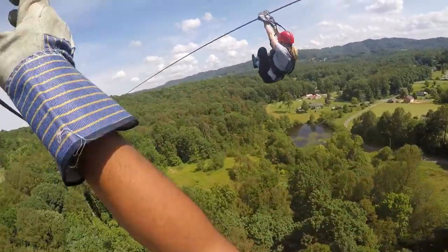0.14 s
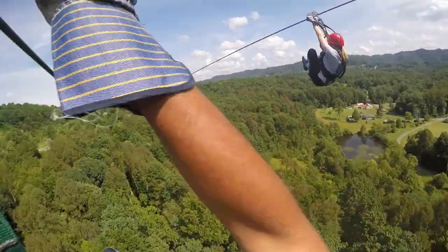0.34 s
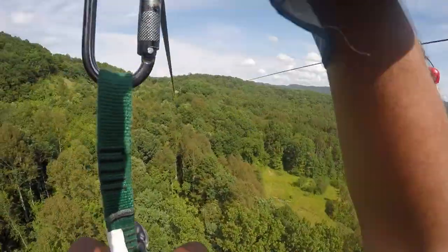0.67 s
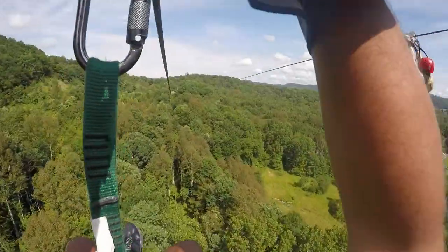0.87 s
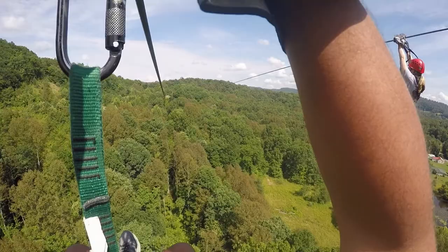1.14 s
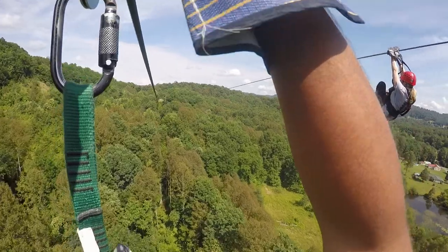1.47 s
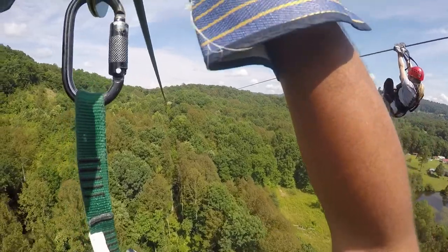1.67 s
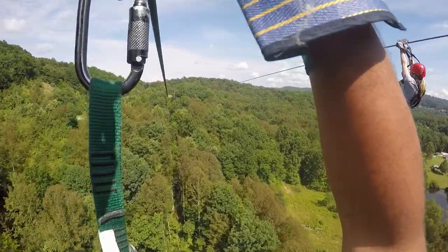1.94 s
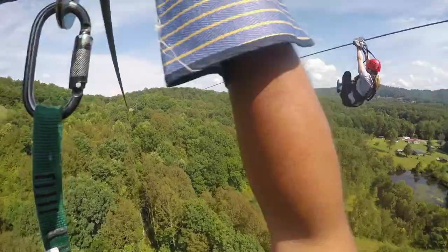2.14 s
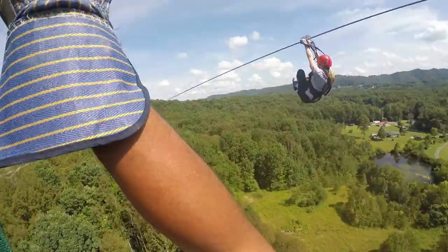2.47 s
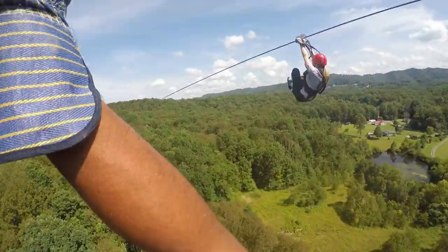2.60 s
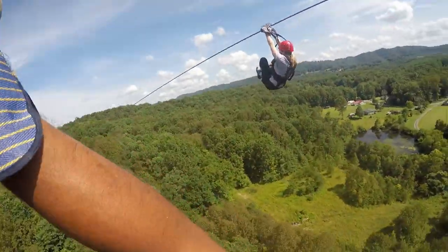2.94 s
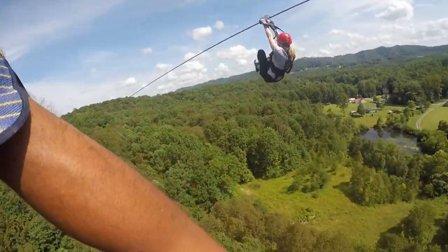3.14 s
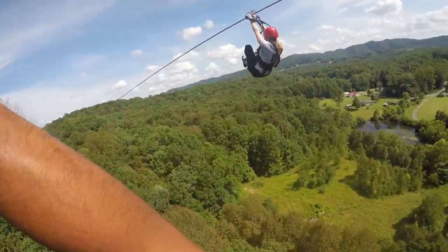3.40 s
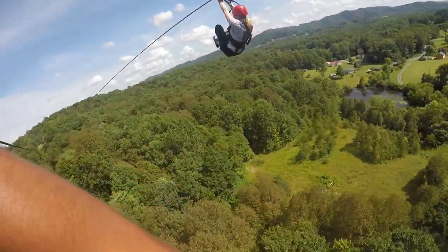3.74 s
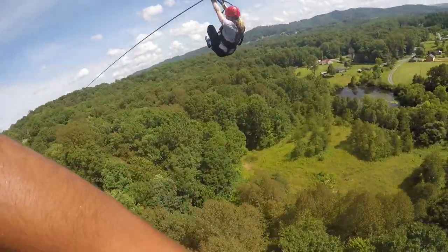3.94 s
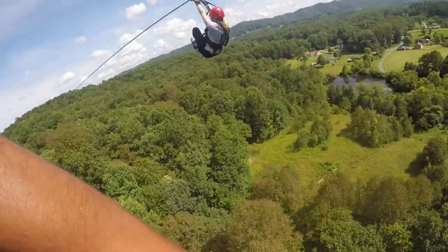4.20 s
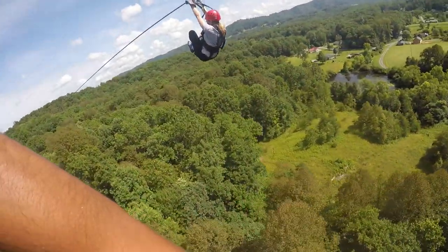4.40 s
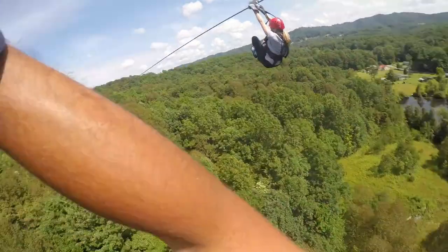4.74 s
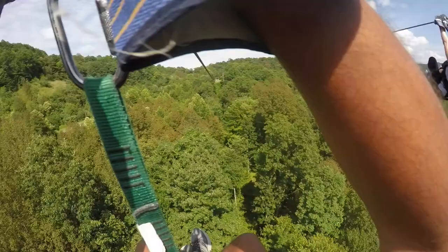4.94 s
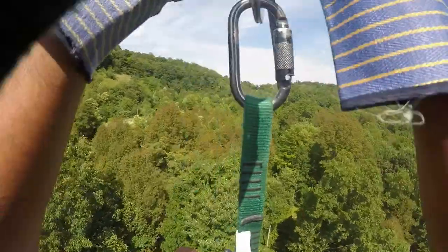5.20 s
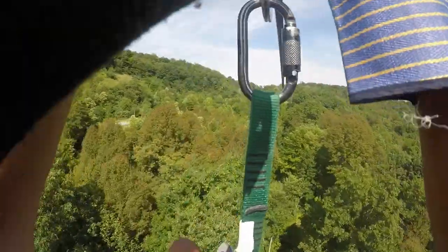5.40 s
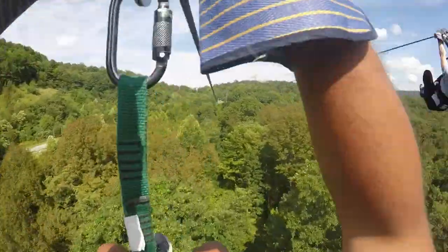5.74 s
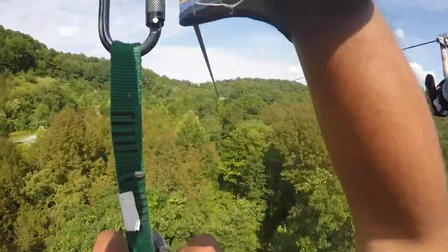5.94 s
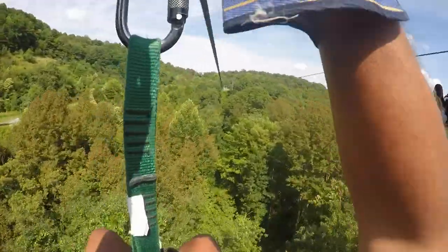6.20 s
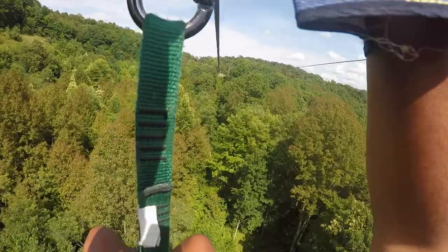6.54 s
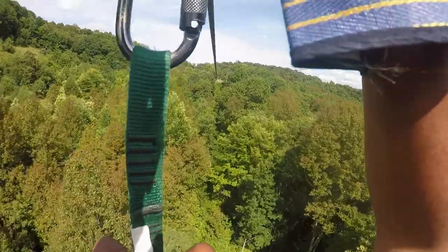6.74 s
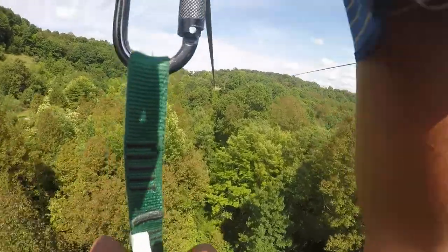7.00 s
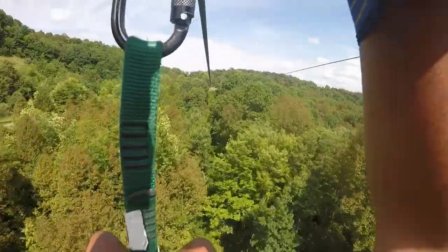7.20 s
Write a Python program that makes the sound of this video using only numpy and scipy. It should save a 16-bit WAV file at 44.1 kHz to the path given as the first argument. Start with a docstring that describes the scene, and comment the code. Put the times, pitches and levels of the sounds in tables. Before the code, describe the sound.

Outdoors on a zip line, a helmet-mounted microphone is buffeted by deep, irregular wind thumps and fluttering rushes. Just overhead, a two-wheeled trolley rolls along a twisted steel cable with a continuous rough metallic whirr, bearings hissing and rattling. Short high whistles come and go, and the tone brightens or dulls as the head turns, while the rolling very gradually slows.

```python
"""Under a six-strand steel cable: a two-wheel trolley rolls down it and slows, just above a helmet camera.
The twisted wires shake both wheels in a pattern that partly returns with every twist, so the trolley rings
in its modes, louder or duller as the head turns; its bearings rattle and some rings sharpen into whistles.
Close on the microphone port, wind thumps, flutters and rushes, and air streams past helmet and straps."""
import sys
import numpy as np
from scipy import signal
from scipy.fft import rfft, irfft, next_fast_len
from scipy.io import wavfile
from scipy.ndimage import uniform_filter1d, map_coordinates

SR = 44100
rng = np.random.default_rng(int(sys.argv[2]) if len(sys.argv) > 2 else 0)


def transcribe(u):
    """Save the signal u as a 16-bit wav file named by the first command-line argument.

    u: samples, shape (n,) or (channels, n), limited to [-1, 1]; the rate is SR.
    q: integer samples, one column per channel.
    """
    v = np.clip(np.atleast_2d(u).T, -1, 1)
    q = np.round(v * 32767).astype(np.int16)
    wavfile.write(sys.argv[1], SR, q)


N = 324555

# cable twists passing under a wheel at the start, and their steady slowing
TWISTS_HZ, SLOWING_HZ_PER_S = 164.7, 3.8
# Modes of each trolley part, low to high:
# f/Hz, width/Hz, relative level/dB in posture 0, 1, 2, 3
PLATES = [(1784, 264, -11.5, -7.5, -9.5, -15.5), (1995, 180, -9.5, -6, -1, -3),
          (2220, 220, 0.5, -1, 0, 2.5), (2348, 270, -5.5, 1.5, -4, -0.5)]
WHEELS = [(2941, 360, -3, 0, -6.5, -1), (3300, 160, -7, -15, -8.5, -16), (3520, 260, -12, 1, -4, -33),
          (3685, 200, 1, -1, -2.5, 5), (3972, 195, -3.5, -5.5, -5.5, -3)]
FRAME = [(4353, 340, 1.5, -32, -4.5, 6.5), (4650, 240, 1.5, 6.5, 0, 8.5), (4890, 136, -14, 6.5, 4, -10),
         (4974, 95, 0.5, -15, -9, 10)]
AXLE = [(5330, 250, 0.5, 3, 0, 10), (5695, 180, -1, 1, 2, 5), (5870, 220, -3.5, -8, 2, -3),
        (6325, 320, -19, -8, 3.5, -0.5)]
LINKS = [(6790, 360, 6.5, 2.5, -7, 3), (7210, 330, 3, 2, -4, -10), (7620, 230, 2, -12, 1, 0.5),
         (8120, 290, 1, -6, 2, 1.5)]
BEARING_RACES = [(8880, 135, 1, -3, 0.5, 1.5), (9550, 230, -1, 1, -7, 2), (10270, 380, -8, -1, -2, -8),
                 (11180, 360, -6.5, -6, 0.5, -5), (11700, 190, 1, -3, -5, 1), (12500, 540, -8, -3, -12, -8)]
BEARING_CAGE = [(13000, 700, -9, -5, -2, -9), (13590, 440, 0, 0, 0, 0), (14400, 700, -15, -9, -6, -14)]
# Each part before the swings, in the order above: level/dB in posture 0, 1, 2, 3,
# then its shares [no unit] of the treble, wheel and axle swings
PART_LEVELS = [(-26, -28, -30.5, -23.5, 0, 0.11, 0.012), (-22.5, -20.5, -22.5, -22, 0.056, 0.75, 0),
               (-24.5, -24, -31.5, -24.5, 0.022, -0.77, 0), (-29.5, -32, -32.5, -37, 0.19, 0.006, 0.96),
               (-33.5, -35, -48, -35, 0.29, -0.64, 0.02), (-40.5, -43, -44.5, -43, .3, .1, 0.18),
               (-39.5, -43.5, -48, -42.5, 0.59, 0.24, 0)]
# Level of all parts, which dips after the first thump of wind and recovers,
# and swings before each part takes its share:
# t/s, level/dB, treble/dB, wheels against frame/dB, axle/dB
TROLLEY_LEVELS = [(0, -3, 3, 1, 1), (.24, -5.5, 7, -2, 3), (.6, 0, 2, 1.5, 1), (1, -1, 1, 2.5, 2),
                  (1.3, 0.5, 2, 0.2, 0), (2.03, 0, 2, -2, 2.5), (2.15, -2.5, 0, -1, 4), (2.4, -2, 6, 1, 0),
                  (2.55, 0.5, -6, -1, -2), (2.66, 0.5, -4, 0, -1), (3, 0, -7, 0.6, 0),
                  (3.4, 1.5, -2, 1, 0.5), (3.83, -1, 0, 0.2, 0), (4.6, 0, -1, 0, 1), (4.96, 0, 6, 0, 4),
                  (5.45, 1, 3, -3, 2), (5.6, 0.5, 4, 0, -4), (5.75, -0.5, 4, 2, 4), (6.05, 0, 5, 0.5, 1),
                  (6.19, 1, -4, -0.5, 0), (6.39, 1.5, 2, 2, -2), (6.72, 0.5, -10, -0.5, -8),
                  (6.87, 1, 5, -0.5, 1), (7.13, 1.5, -12, -1, -7), (7.36, 0.5, -2, 0.5, 1)]
# Strands bumping the groove, before they waver: t/s, level/dB of about six per twist, level/dB of its octave
STRANDS = [(0, -60, -50), (.45, -58, -50), (.7, -40.5, -53), (1.901, -42.5, -52), (2.6, -45, -45),
           (4.6, -50.5, -44), (5.5, -54, -57), (7.36, -74, -58)]


def trolley():
    """Just overhead: the cable drives the low parts, the ball bearings the high ones; each flickers a little."""
    twists_per_s = TWISTS_HZ - SLOWING_HZ_PER_S * np.arange(N) / SR
    travel = np.cumsum(twists_per_s) / SR  # in twists
    cable = unit(wires(travel))
    balls = unit(rattle(spread_db=0.2, per_s=20000))
    cage = unit(rattle(spread_db=1.5, per_s=8000))
    driven_parts = [
        (cable, PLATES),
        (cable + 0.75 * balls, WHEELS),
        (cable, FRAME),
        (cable + 0.18 * balls, AXLE),
        (0.25 * cable + 1.4 * balls, LINKS),
        (balls, BEARING_RACES),
        (cage, BEARING_CAGE),
    ]
    posture = head_posture()
    metal = whistles()
    level_db, *swings_db = curves(TROLLEY_LEVELS)
    for (drive, modes), row in zip(driven_parts, PART_LEVELS):
        posture_db, swing_shares = row[:4], row[4:]
        part_db = facing(posture_db, posture) + level_db + np.dot(swing_shares, swings_db)
        part = turning(drive, modes, posture)
        metal = metal + part * undb(part_db + 0.92 * walk(12))
    out = echoes(metal, posture)
    for per_twist, strand_db in zip((5.964, 11.93), curves(STRANDS)):
        waver = undb(3 * walk(20))
        out = out + undb(strand_db) * waver * np.sin(2 * np.pi * per_twist * travel + 2 * walk(25))
    return out


REPEAT = 0.31  # share of the roughness kept per twist
SECOND_WHEEL, WHEELBASE = -0.27, .812  # share of the rear wheel, spacing in twists
PER_TWIST = 512  # points of roughness


def wires(travel):
    """Roughness along the cable resembles that of one twist before; both wheels roll over it in turn."""
    feedback = np.zeros(PER_TWIST + 1)
    feedback[0], feedback[-1] = 1, -np.clip(REPEAT, 0, .9)
    points = int(travel[-1] + 2) * PER_TWIST
    bumps = signal.lfilter([1.], feedback, rng.standard_normal(points))
    front = map_coordinates(bumps, [(travel + 1) * PER_TWIST], order=1)
    rear = map_coordinates(bumps, [(travel + 1 - WHEELBASE) * PER_TWIST], order=1)
    return front + SECOND_WHEEL * rear


def rattle(spread_db, per_s):
    """Bearings: dense metal ticks of uneven size, coming in flurries."""
    ticks = rng.random(N) < per_s / SR
    uneven_db = spread_db * np.minimum(rng.exponential(size=N), 4.)
    flurry_db = 1.03 * walk(14)
    return ticks * undb(uneven_db + flurry_db) * rng.standard_normal(N)


# A ring briefly sharpens into a whistle:
# start t/s, length/s, start f/Hz, end f/Hz, level/dB before wavering
WHISTLES = [(.28, .14, 5100, 4550, -29), (.52, .35, 5870, 5800, -29), (.58, .52, 5665, 5610, -26.5),
            (1.62, .55, 2220, 2185, -28), (1.0, .55, 2225, 2200, -30), (2.3, .3, 4560, 4520, -29),
            (2.35, .9, 4830, 4730, -30), (2.7, .9, 2335, 2270, -29), (4.7, .3, 4585, 4555, -24.5),
            (4.8, .3, 5020, 4990, -31), (5.4, .18, 5295, 5285, -28), (5.64, .2, 5030, 4960, -30),
            (5.78, .16, 4540, 4520, -28), (6.8, .35, 4775, 4740, -27)]


def whistles():
    """Gliding tones, wavering in pitch and level, that swell and fade."""
    out, t = 0, np.arange(N) / SR
    for start, length, start_hz, end_hz, db in WHISTLES:
        part = np.clip((t - start) / length, 0, 1)
        hz = start_hz + (end_hz - start_hz) * part + 12.0 * walk(40)
        phase = 2 * np.pi * np.cumsum(hz) / SR
        swell = np.sin(np.pi * part) ** .5
        out = out + undb(db + 2.5 * walk(30)) * swell * np.sin(phase)
    return out


# How the head turns under the cable:
# t/s, posture [0 ahead, 1 aside, 2 further round, 3 ahead and nearer the strap]
POSTURE = [(0, 1.4), (.3, 1.07), (.5, 0.0094), (2.08, 0.0097), (2.2, 0.56), (2.8, 1), (2.9, 1.23),
           (3.4, 1.6), (3.55, 2.01), (4.67, 2.07), (4.73, 2.4), (4.95, 2.86), (7.36, 2.9)]


def head_posture():
    """Posture of the head, and the microphone with it, gliding between the listed ones."""
    return curves(POSTURE)[0]


def facing(levels, posture):
    """A value given for each posture, followed as the head turns."""
    return np.interp(posture, np.arange(len(levels)), levels)


def nearness(posture, k):
    """Crossfade share of posture k."""
    return np.clip(1 - abs(posture - k), 0, 1)


def turning(x, table, posture):
    """The same modes, each louder or fainter with the posture of the head."""
    hz, width, *levels = np.transpose(table)
    return unit(sum(nearness(posture, k) * ring(x, list(zip(hz, width, db)), steep=1.55)
                    for k, db in enumerate(levels)))


# Echoes off arm and helmet cancel narrow bands at the microphone:
# f/Hz, width/Hz, share cancelled [0 to 1] in posture 0, 1, 2, 3
DIPS = [(2630, 200, .1, .65, .5, .1), (3390, 200, .1, .1, .1, .4), (5330, 170, .3, .1, .5, .1),
        (6050, 170, .3, .6, .1, .3)]


def echoes(x, posture):
    """Close echoes notch the spectrum, each posture with its own depths."""
    def gain(f, k):
        return np.prod([1 - row[2 + k] / (1 + (2 * (f - row[0]) / row[1]) ** 2) for row in DIPS], axis=0)
    dipped = sum(nearness(posture, k) * shape(x, lambda f: gain(f, k)) for k in range(4))
    return dipped * np.sqrt(np.mean(x ** 2))


# Wind on the port, before gusts and offsets:
# t/s, large eddies level/dB, middle eddies level/dB, small eddies level/dB
WIND = [(0.0, -20, -21, -19.5), (0.04, -11, -19, -23), (0.16, -31, -27, -29), (0.26, -20.5, -22, -23.5),
        (0.78, -21.5, -18, -21), (1.07, -23, -20.5, -25.5), (1.29, -17, -16.5, -20.5),
        (1.7, -20, -19.5, -24), (1.97, -23, -12.5, -21.5), (2.01, -13.5, -21, -24), (2.15, -16, -32, -21.5),
        (2.44, -28, -18.5, -18.5), (2.58, -19.5, -16.5, -22), (3.5, -18.5, -18.5, -26),
        (3.65, -21, -13.5, -24.5), (3.77, -12.5, -22.5, -28.5), (4.82, -18.5, -21.5, -30),
        (5.47, -23, -17, -22), (6.03, -19, -22, -28.5), (6.23, -17.5, -20, -22), (6.66, -24, -15.5, -24),
        (6.86, -16.5, -22.5, -29.5), (6.95, -29, -14.5, -23.5), (7.09, -19, -18, -21.5),
        (7.22, -28, -23, -27), (7.36, -25, -17, -22.5)]
# Eddy sizes, deepest first: f/Hz, width/Hz, relative level/dB
# (sizes in the first two tables are played one by one at levels of their own, so this level cancels)
BUFFET = [(35, 26, 0), (53.2, 23, 0)]
FLUTTER = [(85, 32, -0.29), (121.8, 44, -0.71)]
FLAP = [(165.8, 53, -1.5), (240.5, 68, -5)]
# Lean of the flutter to its higher eddy size: t/s, level/dB (added to the higher, taken from the lower)
FLUTTER_LEAN = [(0, -0.5), (1.2, -0.5), (1.6, 0), (2.6, -2.5), (3.4, 0.5), (4.2, -1), (4.95, 1.5), (5.2, 5),
                (5.8, 2), (6.2, 0), (6.7, -3.5), (7.36, -2.5)]
# Deepest eddies against the large ones: level/dB in posture 0, 1, 2, 3
DEEP_LEVELS = [-4.5, -6, -11, -5]
# Rush against the small eddies: level/dB in posture 0, 1, 2, 3
RUSH_LEVELS = [-14.5, -12.5, -4, -16]
# Spectrum of the rush: f/Hz, relative level/dB (per Hz)
RUSH = [(150, -5.5), (300, -1), (400, -3.5), (550, -10), (850, -15.5), (1400, -19), (3000, -42)]


def wind():
    """At the port: large eddies thump, smaller ones flutter and flap; their bursts carry a rush upward."""
    large_db, middle_db, small_db = curves(WIND)
    thump_db, swell_db = gusts()
    posture = head_posture()
    rush_db = small_db + facing(RUSH_LEVELS, posture) + swell_db
    lean_db = curves(FLUTTER_LEAN)[0]
    burst = walk(25)  # shared by the rush and every eddy size
    rush_hz, spectrum_db = np.transpose(RUSH)
    rush = shape(rng.standard_normal(N), lambda f: undb(np.interp(np.log(f), np.log(rush_hz), spectrum_db)))
    out = rush * undb(rush_db + 1.4 * burst)
    out = out + stream()
    # modes, level in dB, depth of the bursts in dB
    sizes = [
        (BUFFET[:1], large_db + thump_db + facing(DEEP_LEVELS, posture), 1.2),
        (BUFFET[1:], large_db - 1.56 + thump_db, .4),
        (FLUTTER[:1], middle_db - 3.5 - lean_db, 0.35),
        (FLUTTER[1:], middle_db - 3.0 + lean_db, 0.27),
        (FLAP, small_db + 0.14 * swell_db, 1.1),
    ]
    for modes, db, burst_db in sizes:
        eddies = ring(rng.standard_normal(N), modes, steep=1.42)
        # a soft limiter holds each eddy size near one strength
        limited = np.tanh(0.64 * eddies)
        out = out + unit(ring(limited, modes, steep=0.48)) * undb(db + burst_db * burst)
    return out


# Gusts slap the port: centre t/s, length/s, thump level/dB, rush level/dB
# (the small eddies take only a share of the rush)
GUSTS = [(0.03, .1, 3.5, 9), (0.83, 0.23, 6.5, 6.5), (1.197, 0.081, 4, 4), (1.51, .15, 4, 5),
         (2.056, 0.16, 1.5, 5), (2.808, 0.19, 4, 1), (3.32, 0.28, 7.5, 2), (3.532, 0.21, 7.5, 2.5),
         (4.06, 0.11, 3.5, 5), (4.228, .08, 3, 0.5), (4.45, 0.15, 6, 1), (4.592, 0.15, 4, 1),
         (4.9, 0.087, 0, 11.5), (5.225, .1, 2, 1), (5.917, .08, -1, 6), (6.236, 0.09, 1, 5.5),
         (6.53, 0.17, 3, 11.5), (6.645, .08, 0, 7), (7.103, 0.31, 2.5, 7.5)]


def gusts():
    """Brief bell-shaped swells of thump and rush, in dB."""
    t = np.arange(N) / SR
    return sum(np.outer((thump_db, rush_db), np.exp(-((t - centre) * 2 / length) ** 2))
               for centre, length, thump_db, rush_db in GUSTS)


# Air past helmet and straps: f/Hz, width/Hz, relative level/dB
STREAM = [(590, 450, -2), (1030, 240, -0.5), (1240, 710, -8.5)]
# Its course before flicker: t/s, level/dB
STREAM_LEVEL = [(0, -40), (.6, -37), (2, -38.5), (3.5, -38.5), (3.8, -44), (4.8, -39.5), (5.2, -40),
                (6.5, -39), (7.36, -42.5)]


def stream():
    """Background: air streaming past helmet and straps, noise in broad resonances with a slight flicker."""
    air = ring(rng.standard_normal(N), STREAM, steep=1.5)
    return air * undb(curves(STREAM_LEVEL)[0] + 1.1 * walk(10))


def undb(db):
    """Gain of a level in dB."""
    return 10 ** (np.asarray(db) / 20)


def unit(x):
    """Scaled to rms 1."""
    return x / np.sqrt(np.mean(x ** 2))


def curves(rows):
    """Columns of a table after its times, one value per sample."""
    s, *columns = np.transpose(rows)
    return [np.interp(np.arange(N) / SR, s, c) for c in columns]


def walk(rate):
    """Random levels held 1 / rate s and slewed twice; spread near 1."""
    hold = int(SR / rate)
    steps = np.repeat(rng.standard_normal(N // hold + 1), hold)
    return 1.33 * uniform_filter1d(uniform_filter1d(steps, hold), hold)[:N]


def shape(x, gain):
    """Filters x by a gain that is a function of frequency, then scales it to rms 1."""
    size = next_fast_len(N)
    f = np.arange(1, size // 2 + 2) * SR / size
    return unit(irfft(rfft(x, size) * gain(f), size)[:N])


def ring(x, modes, steep):
    """Resonances side by side, their powers added; steep > 1 darkens their skirts."""
    def gain(f):
        return np.sqrt(sum(undb(2 * db) / (1 + ((f - hz ** 2 / f) / w) ** 2) ** steep for hz, w, db in modes))
    return shape(x, gain)


def scene():
    """Trolley and wind at one microphone."""
    return (trolley() + wind())[None]


TOP_HZ = 15070


def record(dry):
    """The camera rounds the loudest buffets, dulls the upper edge and cuts the top."""
    soft = np.tanh(0.8 * dry) / 0.8
    dull = signal.sosfilt(signal.butter(2, 14600, fs=SR, output="sos"), soft)
    return signal.sosfilt(signal.ellip(10, .2, 80, TOP_HZ, fs=SR, output="sos"), dull)


dry = scene()
out = record(dry)
transcribe(out)
```